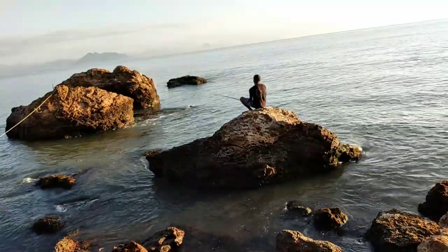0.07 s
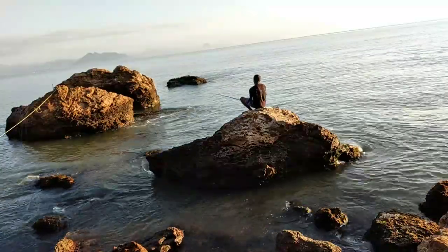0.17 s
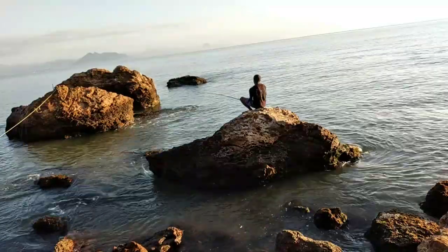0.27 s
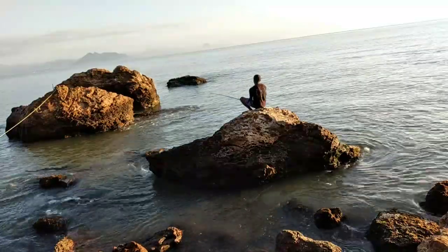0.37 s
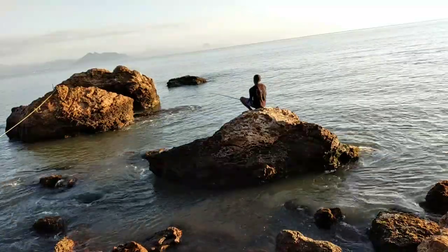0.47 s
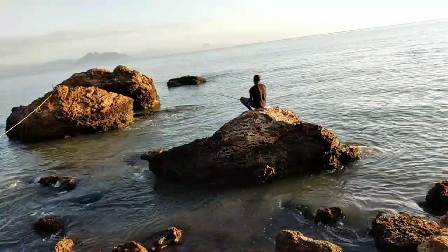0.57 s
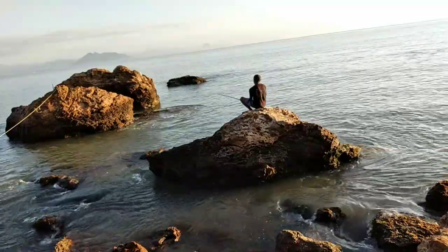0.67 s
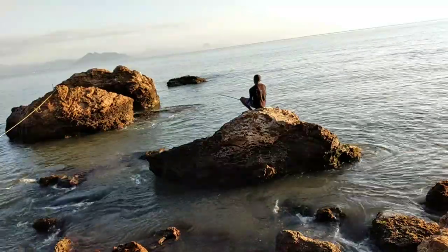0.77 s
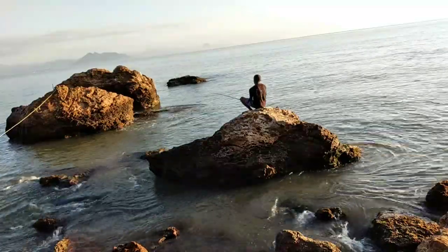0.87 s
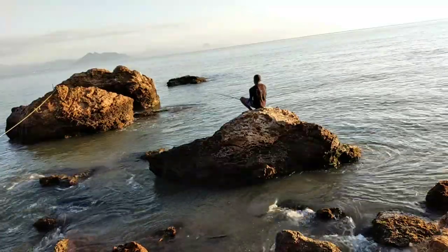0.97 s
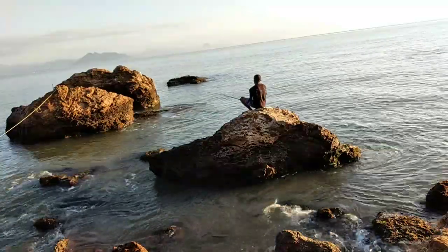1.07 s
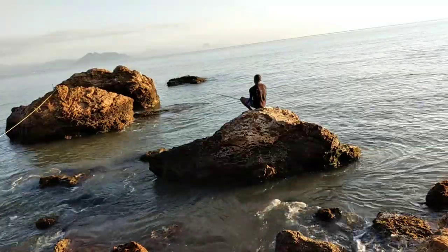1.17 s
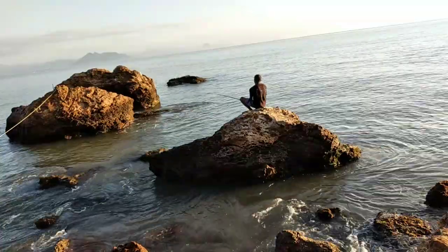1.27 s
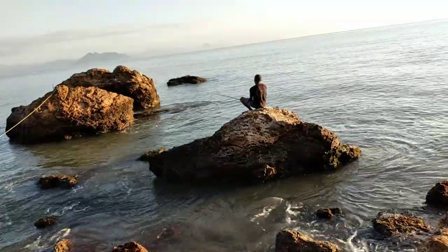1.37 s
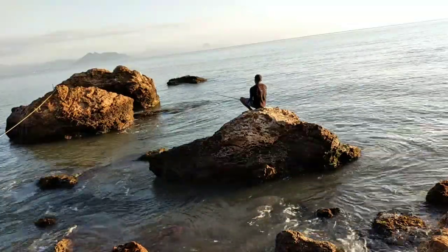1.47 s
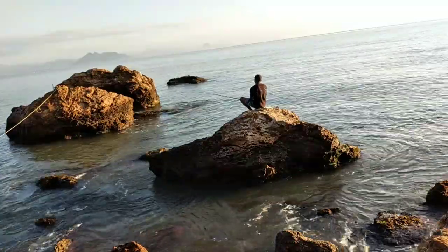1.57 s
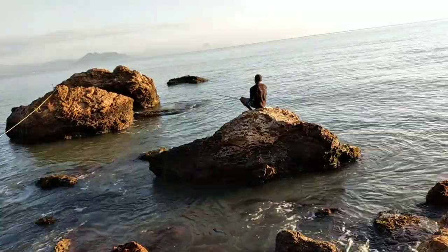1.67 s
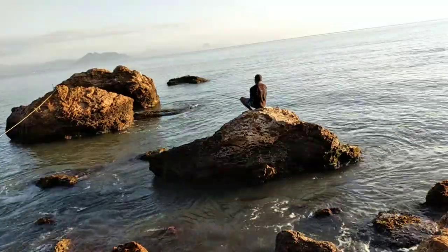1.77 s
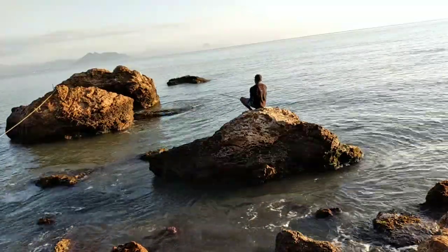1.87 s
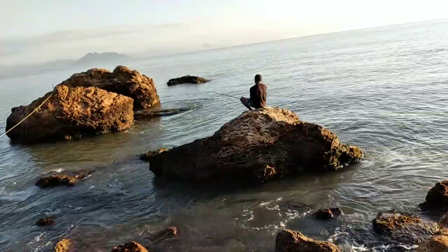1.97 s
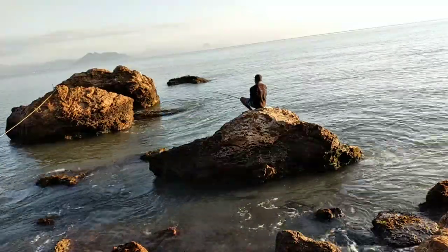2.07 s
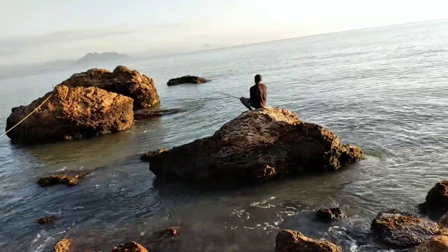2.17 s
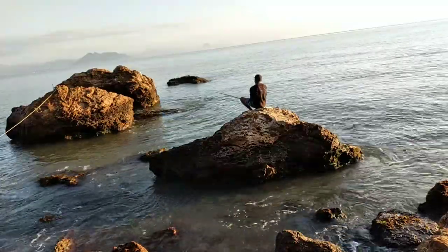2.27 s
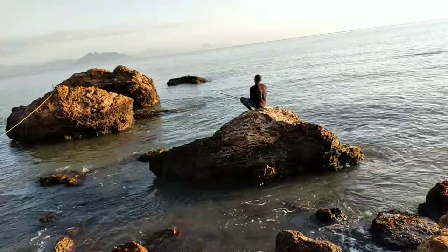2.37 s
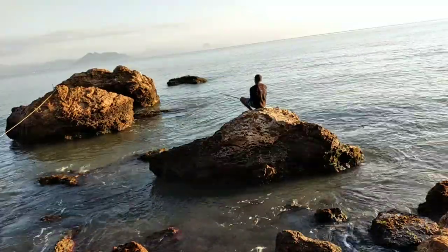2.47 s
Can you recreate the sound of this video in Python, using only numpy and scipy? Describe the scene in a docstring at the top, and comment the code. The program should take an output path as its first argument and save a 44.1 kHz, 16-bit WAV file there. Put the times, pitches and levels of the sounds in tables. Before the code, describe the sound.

A small wave runs in among shore rocks, heard close in stereo: scattered plops and bubbling first, then wet slaps, fizzing spray and dull hollow thuds, then draining to quiet trickling over a low sea murmur.

```python
"""A small sea wave runs in among shore rocks close by and drains away: dense clicks, band by band uneven.
It slaps the stone in noise bursts; trapped air plops and small bubbles chirp as damped, rising sines.
Fine clicks make spray, mostly on the left, and soft foam all round; dull thuds sound from hollows.
Farther off, the open sea murmurs as patchy filtered noise over a low rumble.
Two spaced microphones hear each direction at slightly different times; plops reach the left one first."""
import sys
import numpy as np
from scipy import signal
from scipy.fft import rfft, irfft
from scipy.io import wavfile

SR = 44100
rng = np.random.default_rng(int(sys.argv[2]) if len(sys.argv) > 2 else 0)


def store_pcm(level_fs):
    """Save levels as 16-bit WAV."""
    pcm = np.round(np.clip(level_fs, -1, 1) * 32767).astype(np.int16)
    wavfile.write(sys.argv[1], SR, np.atleast_2d(pcm).T)


N = 110250
T = np.arange(N) / SR  # seconds
HZ = np.maximum(np.fft.rfftfreq(N, 1 / SR), 1)

# Directions the water sounds from. Each row: left lead in ms, wash and slap share in dB, open sea share in dB.
DIRECTIONS = [(0.53, -2, -3), (0.22, -8, -7), (-0.014, -4.5, -1.5), (-0.4, -6, 0)]

# Open sea and its rumble, spectral shapes. Each row: frequency in Hz, relative level in dB.
SEA_COLOUR = [(100, -3.5), (250, 0.5), (600, -6), (1300, -2.5), (2000, -12), (2600, -23), (3000, -31.5),
              (3400, -56), (7200, -50.5), (9000, -50), (16000, -55)]
RUMBLE_COLOUR = [(15, -12.5), (30, -14.5), (55, 0.5), (90, -5), (160, -7), (300, -21.5), (1000, -59)]
SEA_DB, SEA_PATCHY_DB, RUMBLE_DB = -53.5, 4, -56.5

# Spray strength over time. Each row: time in seconds, level in dB before FIZZ_TRIM_DB and the flicker.
FIZZ_LEVEL = [(0, -77), (.025, -86), (.045, -63), (.07, -65), (.09, -77), (.12, -61), (.16, -64.5),
              (.205, -91), (.24, -65), (.28, -87), (.31, -60.5), (.4, -61), (.43, -67.5), (.48, -61.5),
              (.58, -53), (.665, -57.5), (.695, -44), (.74, -51.5), (.82, -49), (.875, -58.5), (.95, -59.5),
              (.995, -40.5), (1.09, -60.5), (1.14, -53.5), (1.22, -59), (1.275, -42), (1.315, -46.5),
              (1.36, -58), (1.59, -65.5), (1.625, -82), (1.7, -89), (2.5, -91)]
# Spray spectral shape. Each row: frequency in Hz, relative level in dB.
FIZZ_COLOUR = [(1500, 2), (2700, -2), (3600, -6), (4900, -7), (5250, 3), (7200, 6.5), (8300, 0),
               (9800, -17.5), (12000, -30), (15500, -45)]
# Spray at the right microphone against the left. Each row: frequency in Hz, difference in dB.
FIZZ_RIGHT = [(2500, -5), (4500, -13.5), (5500, -13), (7500, -20.5), (8300, -18), (10500, 7.5), (15500, 15)]
FIZZ_TRIM_DB, FIZZ_FLICKER_DB = -1.5, 2.65
FIZZ_CLICKS_PER_S, FIZZ_GRAIN_DB = 12000, 2.5  # the foam shares these

# Foam strength over time. Each row: time in seconds, level in dB before FOAM_RIGHT_DB on the right.
FOAM_LEVEL = [(0, -99), (.3, -85), (.55, -73.5), (.85, -62.5), (1.2, -61), (1.29, -52), (1.36, -61),
              (1.603, -66), (1.62, -82), (1.67, -81), (1.7, -92), (2.5, -105)]
# Foam spectral shape. Each row: frequency in Hz, relative level in dB.
FOAM_COLOUR = [(1500, 3), (2700, 8), (3500, 0), (4700, -2.5), (7000, -10.5), (11000, -8.5), (15500, -15.5)]
FOAM_RIGHT_DB = 2.5

# Water knocking in hollows. Each row: start in seconds, starting pitch in Hz, peak in dB.
THUDS = [(1.19, 113, -37), (1.22, 92, -39), (1.25, 176, -40.5), (1.284, 82.6, -33), (1.305, 126, -34),
         (1.405, 113, -43.5)]
THUD_T60_S = 0.073

# Air pockets between the rocks. Each row: start in seconds, starting pitch in Hz, peak in dB before
# panning, time to fall 60 dB in seconds, left against right in dB.
PLOPS = [(.1, 2010, -48, 0.037, 7), (.234, 243.5, -37, 0.072, 6), (.262, 470, -44.5, 0.036, 5),
         (.332, 349, -34, 0.062, 4.5), (.383, 250, -39.5, 0.029, -1), (.425, 877, -41, 0.048, 3),
         (.447, 578, -41, 0.02, -2), (.518, 484, -41, 0.065, 8), (0.558, 955, -40, 0.034, 9),
         (.589, 2023, -33.5, 0.019, 8.5), (.605, 300, -40.5, 0.088, -2), (.68, 366, -35.5, 0.043, 3),
         (.735, 773, -34, 0.02, 8), (.755, 1930, -39.5, 0.04, 12.5), (.79, 260, -44, .06, 3),
         (.835, 750, -44.5, .04, 14), (.893, 1850, -30.5, 0.026, 6.5), (.952, 755, -27, 0.064, -2),
         (.963, 766, -28, 0.036, -3), (.974, 282, -35, .07, 7), (1.043, 1172, -29, 0.024, 11),
         (1.08, 204, -34, 0.023, -2), (1.222, 906, -27.5, .04, -5), (1.241, 1110, -29.5, 0.041, 6),
         (1.367, 280, -40, 0.094, 5), (1.402, 276, -38.5, 0.052, 7), (1.802, 255, -42, 0.041, -3),
         (1.84, 1302, -38.5, 0.019, -10.5), (2.051, 270, -40.5, 0.055, -3), (2.351, 1290, -44, .03, 0),
         (2.376, 1367, -42.5, 0.034, 8)]
PLOP_ATTACK_S, PLOP_RISE_PER_S, PLOP_LEAD_MS = 0.0045, 0.7, 0.34  # the thuds share these

BUBBLES_PER_S, BUBBLE_LOW_HZ, BUBBLE_HIGH_HZ = 420, 356.5, 2463
BUBBLE_DB = -4  # against the WASH_LEVEL table
BUBBLE_CYCLES = 21.4  # mean number of cycles to fall 60 dB
BUBBLE_SPREAD_DB, BUBBLE_RISE_PER_S = 3.5, 2.4
ROCK_ECHO_DB, ROCK_ECHO_T60_S, ROCK_ECHOES_PER_S = -8.5, .09, 500

# Slaps on rock. Each row: start in seconds, level at the peak in dB, time to fall 60 dB in seconds.
SLAPS = [(0.979, -29.5, 0.068), (1.026, -36.5, 0.035), (1.054, -36.5, 0.064), (1.082, -39.5, 0.055),
         (1.19, -34.5, 0.11), (1.238, -34, 0.15), (1.267, -33.5, 0.07), (1.292, -34.5, 0.1),
         (1.313, -39, .07), (1.404, -45.5, .07)]
# Slap spectral shape. Each row: frequency in Hz, relative level in dB.
SLAP_COLOUR = [(100, -12), (300, -2), (900, 0.5), (2200, -5.5), (3300, -21.5), (4700, -30.5), (6500, -20.5),
               (9000, -53), (15000, -51)]
SLAP_ATTACK_S = 0.0066

# Wash strength over time. Each row: time in seconds, level in dB before WASH_TRIM_DB or BUBBLE_DB.
WASH_LEVEL = [ [(0.0, -55), (0.03, -59), (0.83, -41.5), (0.93, -43), (0.97, -36.5), (1.0, -42),
              (1.06, -37.5), (1.06, -39.5), (1.22, -38.5), (1.25, -37.5), (1.36, -45.5), (1.39, -42.5),
              (1.66, -51.5), (2.5, -61.5)], ][0]
# Wash spectral shape. Each row: frequency in Hz, relative level in dB.
WASH_COLOUR = [(60, -8), (150, -2), (300, -2), (800, 2.5), (1300, 0), (2050, -6.5), (2600, -18),
               (3300, -40.5), (4200, -50), (9000, -52), (16000, -62)]
WASH_TRIM_DB, WASH_PATCHY_DB, WASH_GRAIN_DB = -0.6, 3.5, 1.8

CUTOFF_HZ, FADE_S = 15750, .004


def from_db(db):
    """Decibels to amplitude gain."""
    return 10 ** (np.asarray(db) / 20)


def rms_one(x):
    """Scale to unit power, over both microphones together if there are two."""
    return x / np.sqrt(np.mean(x ** 2) + 1e-20)


def level(rows):
    """Gain over time, straight in dB between the rows."""
    seconds, db = np.transpose(rows)
    return from_db(np.interp(T, seconds, db))


def colour(x, points):
    """Filter a sound by gains in dB, straight between the points on a log frequency scale."""
    hz, db = np.transpose(points)
    gain = from_db(np.interp(np.log(HZ), np.log(hz), db))
    return irfft(rfft(x) * gain, N)


def drift(rate_hz):
    """Smooth random wander of spread 1: noise weakened above the given rate."""
    spectrum = rfft(rng.standard_normal(N))
    return rms_one(irfft(spectrum / (1 + (HZ / rate_hz) ** 2), N))


def pair(x, lead_ms):
    """Both microphones; the right one hears later by the lead, or earlier if it is negative."""
    return np.array([x, np.interp(T - lead_ms / 1000, T, x)])


def crackle(per_s, spread_db):
    """Random clicks of either sign and uneven size."""
    hits = rng.random(N) < per_s / SR
    size = from_db(spread_db * np.minimum(rng.exponential(1, N), 5))
    return hits * size * rng.choice([-1, 1], N)


def churn(x, patchy_db, rate_hz):
    """Each half-octave band swells and sinks on its own."""
    spectrum = rfft(x)
    place = 2 * np.log2(np.clip(HZ, 64, 4096))  # in half octaves
    out = np.zeros(N)
    for k in range(12, 25):
        band = irfft(spectrum * np.maximum(1 - abs(place - k), 0), N)
        out += band * from_db(patchy_db * drift(rate_hz))
    return out


def bubble(hz, t60, attack_s, rise_per_s):
    """A damped sine that rises in pitch as the bubble nears the surface."""
    t = np.arange(int((t60 + attack_s) * SR)) / SR
    attack = np.minimum(t / attack_s, 1)
    decay = from_db(-60 * np.maximum(t - attack_s, 0) / t60)
    return attack * decay * np.sin(2 * np.pi * hz * (t + rise_per_s * t * t / 2))


def add(out, sound, s, lead_ms, pan_db):
    """Place a short sound by its arrival time and level at each microphone."""
    for channel, start, db in ((0, s, pan_db / 2), (1, s + lead_ms / 1000, -pan_db / 2)):
        part = out[channel, max(int(start * SR), 0):][:len(sound)]
        part += from_db(db) * sound[:len(part)]


def open_sea():
    """Dull murmur of farther water from several directions: patchy noise over a steady low rumble."""
    murmur = np.zeros((2, N))
    for lead_ms, _, db in DIRECTIONS:
        water = churn(rng.standard_normal(N), SEA_PATCHY_DB, rate_hz=18)
        murmur += from_db(db) * pair(water, lead_ms)
    rumble = pair(rms_one(colour(rng.standard_normal(N), RUMBLE_COLOUR)), 0.21)
    return from_db(SEA_DB) * rms_one(colour(murmur, SEA_COLOUR)) + from_db(RUMBLE_DB) * rumble


def fine_clicks(points):
    """Dense clicks, independent at each microphone, filtered to one spectral shape."""
    clicks = np.array([crackle(FIZZ_CLICKS_PER_S, FIZZ_GRAIN_DB) for _ in range(2)])
    return rms_one(colour(clicks, points))


def foam():
    """Soft hiss all round, made of fine clicks, until the foam has drained."""
    return level(FOAM_LEVEL) * fine_clicks(FOAM_COLOUR) * from_db([[0], [FOAM_RIGHT_DB]])


def spray():
    """Fine drops fizz as flickering clicks, mostly at the left microphone."""
    left, right = fine_clicks(FIZZ_COLOUR)
    flicker = from_db(FIZZ_TRIM_DB + FIZZ_FLICKER_DB * drift(27))
    return level(FIZZ_LEVEL) * flicker * np.array([left, colour(right, FIZZ_RIGHT)])


def thuds():
    """The crest closes off hollows under the rocks: deep damped sines, equally loud on both sides."""
    out = np.zeros((2, N))
    for s, hz, db in THUDS:
        knock = bubble(hz, THUD_T60_S, PLOP_ATTACK_S, PLOP_RISE_PER_S)
        add(out, from_db(db) * knock, s, PLOP_LEAD_MS, 0)
    return out


def small_bubbles():
    """A swarm of short chirps whose strength follows the wash that stirs them in."""
    out = np.zeros((2, N))
    for when, pitch, size, ring, side in rng.random((int(BUBBLES_PER_S * N / SR), 5)):
        hz = BUBBLE_LOW_HZ * (BUBBLE_HIGH_HZ / BUBBLE_LOW_HZ) ** pitch
        gain = from_db(BUBBLE_SPREAD_DB * min(-np.log(1 - size), 3))
        t60 = BUBBLE_CYCLES * (.5 + ring) / hz
        chirp = bubble(hz, t60, 1 / hz, BUBBLE_RISE_PER_S)
        # side runs from left (0) to right (1)
        add(out, gain * chirp, when * N / SR, .52 - side ** 2, 3 - 5 * side)
    return from_db(BUBBLE_DB) * level(WASH_LEVEL) * rms_one(out)


def pockets():
    """Air trapped between the rocks rings as single plops."""
    out = np.zeros((2, N))
    for s, hz, db, t60, pan_db in PLOPS:
        plop = bubble(hz, t60, PLOP_ATTACK_S, PLOP_RISE_PER_S)
        add(out, from_db(db) * plop, s, PLOP_LEAD_MS, pan_db)
    return out


def among_rocks(x):
    """Short scattered echoes off the stone faces, different for each microphone."""
    echoes = np.array([crackle(ROCK_ECHOES_PER_S, 1.8) for _ in range(2)])
    echoes = echoes * from_db(-60 * T / ROCK_ECHO_T60_S)
    echoes = echoes / np.sqrt(np.sum(echoes ** 2, axis=1, keepdims=True) + 1e-20)
    return x + from_db(ROCK_ECHO_DB) * signal.fftconvolve(x, echoes, axes=1)[:, :N]


def slaps():
    """Short broad splashes as the crest hits stone: clicks under a quick rise and a decay."""
    shape = np.zeros(N)
    for s, db, t60 in SLAPS:
        attack = np.clip((T - s) / SLAP_ATTACK_S, 0, 1)
        decay_db = -60 * np.maximum(T - s - SLAP_ATTACK_S, 0) / t60
        shape += attack * from_db(db + decay_db)
    splash = np.zeros((2, N))
    for lead_ms, db, _ in DIRECTIONS:
        splash += from_db(db) * pair(crackle(9000, 2.3), lead_ms)
    return shape * rms_one(colour(splash, SLAP_COLOUR))


def wash():
    """Water tumbling over stone: dense, uneven splatter from several directions."""
    out = np.zeros((2, N))
    for lead_ms, db, _ in DIRECTIONS:
        splatter = churn(crackle(8000, WASH_GRAIN_DB), WASH_PATCHY_DB, rate_hz=19)
        out += from_db(db) * pair(splatter, lead_ms)
    return from_db(WASH_TRIM_DB) * level(WASH_LEVEL) * rms_one(colour(out, WASH_COLOUR))


def scene():
    """All the water together; only the bubbles and plops echo among the rocks."""
    background = open_sea() + foam() + spray()
    trapped_air = among_rocks(small_bubbles() + pockets())
    return background + thuds() + trapped_air + slaps() + wash()


def record(dry):
    """Ease both ends in and out, then cut the top steeply."""
    ease = np.clip(np.minimum(T, T[-1] - T) / FADE_S, 0, 1)
    low_pass = signal.ellip(10, .1, 70, CUTOFF_HZ, fs=SR, output="sos")
    return signal.sosfilt(low_pass, dry * ease)


dry = scene()
out = record(dry)
store_pcm(out)
```